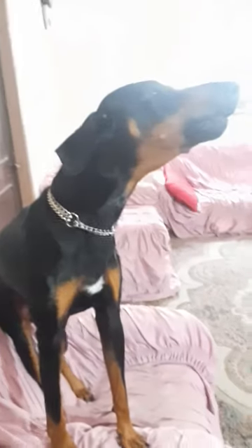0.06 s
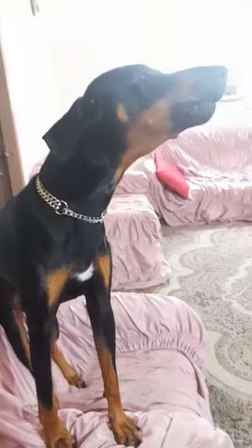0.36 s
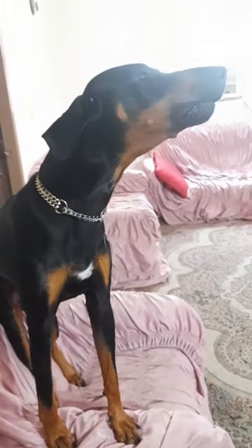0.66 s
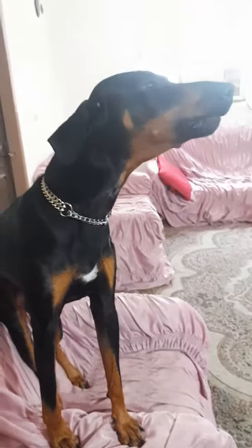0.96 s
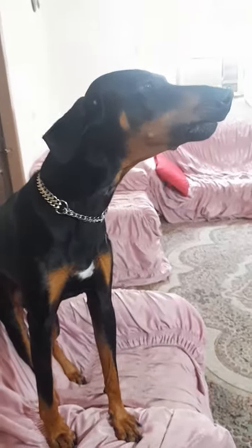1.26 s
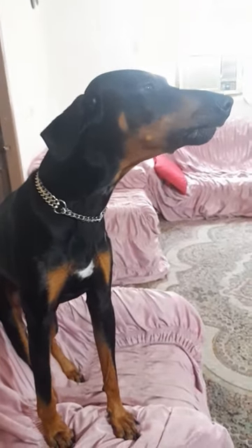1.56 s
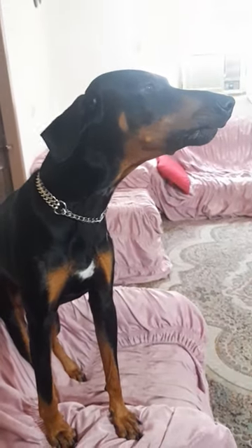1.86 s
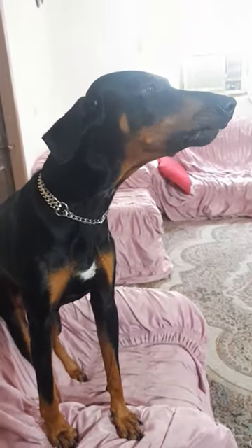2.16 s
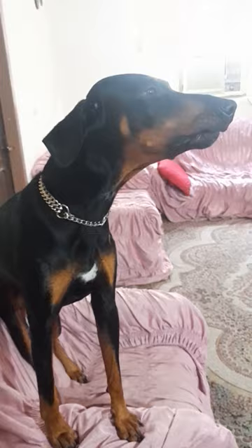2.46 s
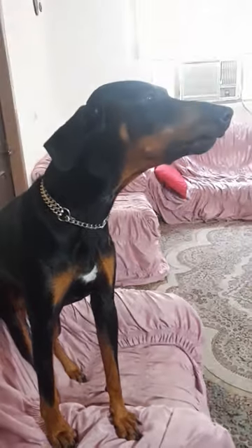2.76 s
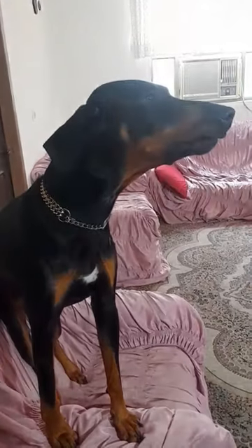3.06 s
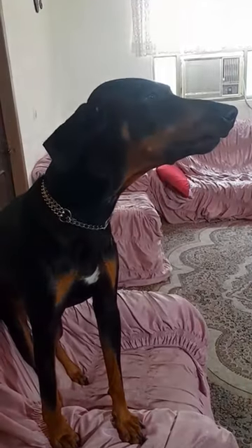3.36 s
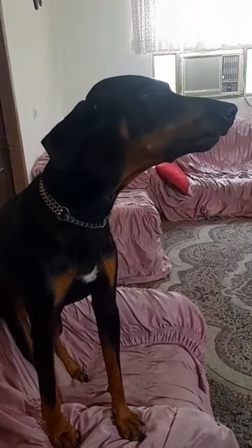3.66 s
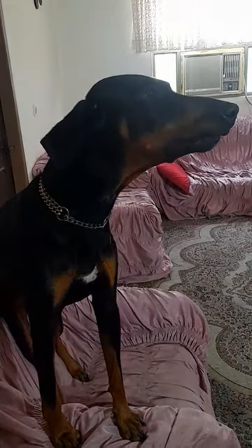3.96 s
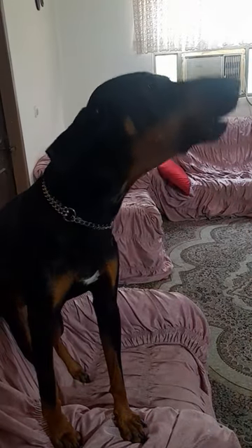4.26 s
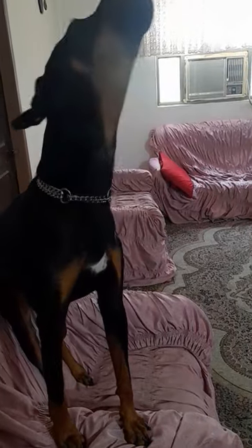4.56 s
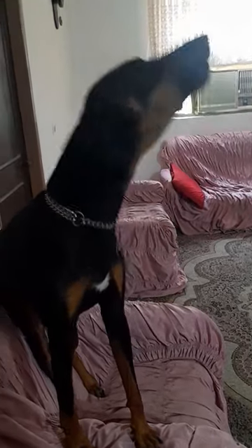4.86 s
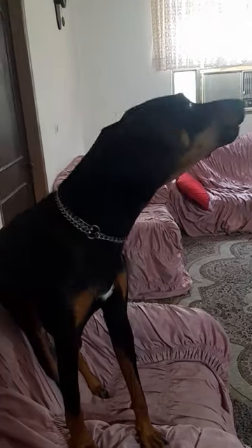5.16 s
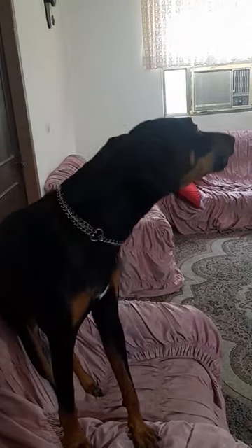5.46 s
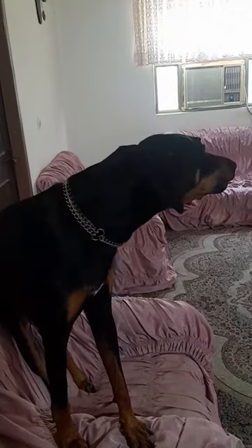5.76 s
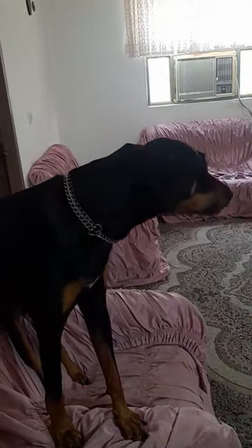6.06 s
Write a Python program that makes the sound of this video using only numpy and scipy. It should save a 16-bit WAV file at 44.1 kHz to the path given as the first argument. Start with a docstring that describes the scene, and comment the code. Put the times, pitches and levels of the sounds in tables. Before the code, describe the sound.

A large dog howls close to a phone microphone in a living room. The first howl is a clean, hollow note that sags and ends in a creak. In the pause, a window air conditioner's hum and rush slowly swell. Then the dog bursts out with a hoarse bark that cracks, clears into a second howl and falls away, pushing the hum down again.

```python
"""A furnished living room, where a large dog howls twice close to a phone.
Its vocal folds make a harmonic series, which mouth and nose filter by resonance. The first howl
is a clean note that sags into a creak; the second bursts out as a hoarse bark of turbulent air,
cracks, then clears and falls. A window air conditioner hums behind; the phone's gain control
pushes it down under each howl and lets it swell back in the pause."""
import sys
import numpy as np
from scipy import signal
from scipy.fft import rfft, irfft, next_fast_len
from scipy.io import wavfile
from scipy.ndimage import uniform_filter1d, map_coordinates

SR = 44100
rng = np.random.default_rng(int(sys.argv[2]) if len(sys.argv) > 2 else 0)


def to_wav(sig):
    """Store sig (one row per channel, or 1-D mono) as 16-bit WAV at the path in sys.argv[1].

    Samples outside -1..1 are clipped; the rate is SR.
    """
    pcm = np.clip(np.atleast_2d(sig), -1, 1) * 32767
    pcm = np.round(pcm).astype(np.int16)
    wavfile.write(sys.argv[1], SR, pcm.T)  # frames by channels


N = 273861


def amp(db):
    """Decibels to amplitude ratio."""
    return 10 ** (np.asarray(db) / 20)


def unit(x):
    """Normalisation to rms 1."""
    return x / np.sqrt(np.mean(x ** 2) + 1e-20)


def along(points, hz):
    """Interpolation of (f/Hz, value) points on a log axis."""
    f, v = np.transpose(points)
    return np.interp(np.log(hz + 1), np.log(f + 1), v)


def curve(rows, t):
    """Linear interpolation of (t/s, value) points."""
    return np.interp(t, *np.transpose(rows))


def envelope(gesture, t):
    """Linear rise, hold, exponential decay: (start/s, attack/s, hold/s, fall/(dB/s))."""
    start, attack, hold, fall = gesture
    return np.clip((t - start) / attack, 0, 1) * amp(-fall * np.maximum(t - start - attack - hold, 0))


def wobble(rate):
    """Smooth random modulation, rate knots a second."""
    knots = rng.standard_normal(int(N * rate / SR) + 4)
    coarse = np.arange(0, N, 32)
    return np.interp(np.arange(N), coarse, map_coordinates(knots, [coarse * rate / SR], order=2))


def filtered(x, response):
    """Linear filtering: the spectrum times a frequency response."""
    size = next_fast_len(N + SR // 2)
    return irfft(rfft(x, size) * response(np.fft.rfftfreq(size, 1 / SR)), size)[..., :N]


def coloured(x, spectrum):
    """Spectral shaping by (f/Hz, level/dB) points, at rms 1."""
    return unit(filtered(x, lambda hz: amp(along(spectrum, hz))))


def tones(phase, table):
    """Superposition of sines at whole or half multiples of the pitch."""
    return np.sqrt(2) * sum(amp(db) * np.sin(np.round(2 * k) / 2 * phase) for k, db in table)


def air_conditioner(air_db=-44, hiss_db=-72):
    """Broadband fan noise, partly coherent between the ports, under a motor's line spectrum."""
    # spectra of the air rush and the hiss: (f/Hz, relative level/dB)
    rush_spectrum = [(15, -51.5), (25, -24), (69, -4.5), (112, -6.5), (139, -1.5), (202, -3), (264, -8),
                     (427, -7), (709, -19.5), (1310, -24), (1860, -29), (4260, -42.5), (15000, -64.5)]
    hiss_spectrum = [(1500, -26), (4400, 2.5), (5800, -10), (8500, -9), (10000, -18)]
    # lines of motor and fan: (f/Hz, level/dB)
    motor_lines = [(80.7, -60.5), (145.3, -49.5), (193.8, -49), (290.7, -63.5), (387.6, -57), (436.0, -53),
                   (532.9, -60.5)]
    fan_lines = [(1157, -70), (1206, -74), (1254, -71), (1303, -73), (1351, -72), (1448, -72), (1642, -75),
                 (2126, -77)]
    # likeness of the rush at the two ports: (f/Hz, correlation)
    coherence = [(100, .93), (400, 0.66), (1000, 0.31)]
    t = np.arange(N) / SR

    def mid_and_side(hz):
        angle = np.arccos(np.clip(along(coherence, hz), -1, 1)) / 2
        return amp(along(rush_spectrum, hz)) * [np.cos(angle), np.sin(angle)]

    def line(hz, db):
        peak = np.sqrt(2) * amp(db + 1.5 * wobble(5))
        return peak * np.sin(2 * np.pi * (hz * t + rng.random()) + .25 * wobble(6))

    mid, side = filtered(rng.standard_normal((2, N)), mid_and_side)
    rush = amp(air_db + 1.3 * wobble(26)) * unit(np.array([mid + side, mid - side]))
    flutter_db = 4 * np.tanh(wobble(14))
    hiss = amp(hiss_db + flutter_db) * coloured(rng.standard_normal((2, N)), hiss_spectrum)
    hum = sum(line(hz, db) for hz, db in motor_lines)
    whine = np.array([sum(line(hz, db) for hz, db in fan_lines) for port in range(2)])
    return (rush + hiss + hum + whine) * amp([[-.7], [.7]])


def fundamental_db(pitch, t, middle_hz=301.1, middle_db=-22, db_per_octave=40.5, beat_width_s=0.017):
    """The fundamental grows with pitch; interference with the room's echoes lifts or sinks it."""
    # the room's standing waves: (f/Hz, gain/dB)
    standing_waves = [(210, -2), (232, 4.5), (254, 5), (270, -4.5), (292, 2), (307, -5.5), (311, 0.5),
                      (314, 2.5), (335, 5), (365, 1)]
    # dips as the note beats against its echo: (t/s, depth/dB)
    beats = [(4.392, 6.5), (4.43, 10), (4.604, 9.5), (4.668, 9), (4.779, 9), (5.283, 9), (5.847, 11),
             (5.99, 9.5)]
    # envelope of the shove of air at the head of the bark
    push = (4.298, 0.015, 0.021, 180)
    source_db = middle_db + db_per_octave * np.log2(pitch / middle_hz) + 4 * envelope(push, t)
    dips_db = sum(depth * np.exp(-((t - s) / beat_width_s) ** 2) for s, depth in beats)
    return source_db + along(standing_waves, pitch) - dips_db


def overtones(phase, pitch, spectrum, orders, on, flicker_db):
    """Formant filtering: harmonics glide through resonances, each flickering; rms 1 together."""
    flicker = flicker_db * np.array([wobble(5)[on] for k in orders])
    gains = amp(along(spectrum, orders[:, None] * pitch[on]) + flicker)
    waves = np.sin(orders[:, None] * phase[on] + rng.uniform(0, 2 * np.pi, (len(orders), 1)))
    return (gains * waves).sum(0) / np.sqrt((gains ** 2).sum(0) / 2)


def mouth(phase, pitch, t, on):
    """Cavity resonance shapes harmonics 4-8; a raised muzzle and rounded lips lower the formants."""
    # mouth resonances: (f/Hz, relative level/dB)
    formants = [(1000, -7), (1280, 0), (1560, -8), (1840, -9), (2130, -17), (2380, -26), (2630, -21),
                (3200, -38)]
    # their shift by the lips: (t/s, frequency factor)
    lips = [(4.3, 1.02), (4.45, 0.89), (4.6, 0.84), (4.9, 1.1), (5.15, 0.91)]
    return overtones(phase, pitch / curve(lips, t), formants, np.arange(4, 9), on, flicker_db=5)


def nose(phase, pitch, puffs, rough, on):
    """Nasal resonance, driven by harmonics 9-33 and, as the voice roughens, by turbulence."""
    # nasal resonances: (f/Hz, relative level/dB)
    formants = [(1500, -55.5), (2650, -12.5), (3300, -33), (4400, -15), (4920, 2), (5250, -14.5),
                (5700, -14), (7300, -25), (8100, -15.5), (9800, -38.5), (15000, -30.5)]
    noise_share = np.clip(rough + .04, 0, 1)
    ring = np.sqrt(noise_share) * coloured(puffs, formants)
    harmonics = overtones(phase, pitch, formants, np.arange(9, 34), on, flicker_db=4)
    ring[on] += np.sqrt(1 - noise_share[on]) * harmonics
    return ring


def whistle(phase, t, db=-59):
    """Constriction: the tight throat brings out a few high harmonics as the first howl opens."""
    # whistle partials: (multiple of the pitch, relative level/dB)
    partials = [(8, -2), (18, -6), (21, -3.5), (25, -1.5), (28, -11.5)]
    # envelope of the tightening
    tightening = (0, .005, .01, 35)
    return amp(db) * envelope(tightening, t) * tones(phase, partials)


def howl(melody, octave, mouth_level, nasal_db, jitter=0.013, tremor=0.0008, shimmer_db=3, fade_s=0.003):
    """Source and filter: vocal folds drive the throat; irregular cycles make it creak and rasp."""
    # resonances met by the third harmonic: (f/Hz, level/dB)
    third_resonances = [(630, -66), (785, -45.5), (930, -50.5), (985, -46), (1060, -34)]
    # the hoarse throat: (f/Hz, relative level/dB)
    rasp_spectrum = [(50, -60), (150, -24), (330, -3), (500, -13), (720, -2), (930, -9), (1170, 0),
                     (1600, -16), (2250, -10), (2900, -33), (5000, -33), (10000, -60)]
    # envelopes of the hoarse burst and of the strain that makes the nose ring
    burst = (4.298, 0.02, 0.081, 140)
    strain = (4.3, 0.039, .14, 32)
    t = np.arange(N) / SR
    start, end = melody[0][0], melody[-1][0]
    gate = np.sin(np.pi / 2 * np.clip(np.minimum(t - start, end + 2 * fade_s - t) / fade_s, 0, 1)) ** 2
    on = gate > 0
    note, octave_db, bark = curve(melody, t), curve(octave, t), envelope(burst, t)
    sag_hz = np.maximum(262 - note, 0)  # the voice creaks below 262 Hz
    rough = np.clip(0.12 + 0.97 * bark + 0.02 * sag_hz, 0, 1)
    pitch = note * (1 + jitter * rough * wobble(230) + tremor * wobble(35))
    phase = 2 * np.pi * np.cumsum(pitch) / SR
    # the three lowest harmonics carry the hollow tone
    first_db = fundamental_db(note, t)
    voice = tones(phase, [(1, first_db), (2, octave_db + 0.4), (3, along(third_resonances, 3 * note))])
    voice += whistle(phase, t) + crack(phase, t)
    voice[on] += amp(curve(mouth_level, t)[on] + 3) * mouth(phase, pitch, t, on)
    puffs = (1 + 1.1 * np.cos(phase)) * rng.standard_normal(N)  # one turbulent puff per cycle
    # the nasal ring follows the second harmonic, rises with strain and fades in the creak
    ring_db = nasal_db + 0.64 * (octave_db + 38.5) + 16 * envelope(strain, t) - .25 * sag_hz
    voice += amp(ring_db) * nose(phase, pitch, puffs, rough, on)
    rasp, breath = amp(-26.5) * bark, amp(first_db - 46)
    voice += (rasp + breath) * coloured(puffs, rasp_spectrum)
    return gate * voice * amp(shimmer_db * rough * np.tanh(wobble(120)))


def room(x, gap_s=.005):
    """Reverberation: diffuse reflections decay exponentially, the treble fastest."""
    # reverberation time: (f/Hz, T60/s)
    decay = [(150, 1.01), (2000, 0.58), (12000, 0.2)]
    # strength of the reflections: (f/Hz, level/dB)
    reflections = [(330, -15), (600, -8.5), (1200, -9), (5000, -3)]
    hz, t, noise = signal.stft(rng.standard_normal((2, SR // 2)), SR, nperseg=256)
    tail = signal.istft(noise * amp(-60 * t / along(decay, hz)[:, None]), SR, nperseg=256)[1]
    tail = np.pad(tail / np.linalg.norm(tail, axis=1, keepdims=True), ((0, 0), (int(gap_s * SR), 0)))
    mid, side = signal.fftconvolve(x[None], tail, axes=1)[:, :N]
    side = filtered(side, lambda hz: np.clip(hz / 900, 0, 1) ** 2)  # long waves reach both ports alike
    diffuse = np.array([mid + side, mid - side]) / np.sqrt(2)
    return filtered(diffuse, lambda hz: amp(along(reflections, hz)))


def ducking(voice, window_s=0.035, threshold_db=-31.5, cut_share=0.75, recover_db_per_s=4):
    """Automatic gain control: a loud voice cuts the background at once, and it creeps back."""
    level_db = 10 * np.log10(np.abs(uniform_filter1d(voice ** 2, int(window_s * SR))) + 1e-12)
    recovery_db = recover_db_per_s * np.arange(N) / SR
    cut_db = cut_share * np.maximum(level_db - threshold_db, 0)
    return amp(recovery_db - np.maximum.accumulate(cut_db + recovery_db))


def woof(at_s=4.317, width_s=.011, db=-20):
    """Chest resonance: a short, low pulse of noise as the bark breaks out."""
    # chest resonances: (f/Hz, relative level/dB)
    chest = [(50, -59.5), (115, -1.5), (145, 0.5), (200, -9.5), (280, -1.5), (1000, -52.5)]
    pulse = np.exp(-((np.arange(N) / SR - at_s) / width_s) ** 2 / 2)
    return amp(db) * pulse * coloured(rng.standard_normal(N), chest)


def crack(phase, t, db=-39):
    """Period doubling: every other cycle is stronger, adding tones between the harmonics."""
    # half-order partials: (multiple of the pitch, relative level/dB)
    partials = [(.5, -13.5), (1.5, 5), (2.5, -1.5), (3.5, -18)]
    # envelope of the doubling
    doubling = (4.55, 0.11, 0.011, 300)
    return amp(db) * envelope(doubling, t) * tones(phase, partials)


def scene(lead_s=0.0002, away_hz=2800):
    """Direct and reverberant sound of the dog add at two microphone ports, over the air conditioner."""
    # pitch of each howl: (t/s, f/Hz)
    first_pitch = [(0, 314.8), (0.502, 312), (0.669, 307.3), (0.814, 293.6), (0.889, 273.1), (1.073, 265.3),
                   (1.3, 254.9), (1.412, 218.6), (1.486, 207.8)]
    second_pitch = [(4.3, 305), (4.32, 330.3), (4.385, 365.7), (4.455, 346.5), (4.5, 316), (4.61, 357.4),
                    (4.78, 322.8), (5.283, 291.7), (5.373, 309.6), (5.83, 295.3), (5.985, 272.8),
                    (6.2, 242)]
    # second harmonic and mouth overtones, one curve per howl: (t/s, relative level/dB)
    octaves = [
        [(0.03, -40), (0.582, -43), (0.652, -55), (0.712, -32), (1.086, -47), (1.11, -35), (1.258, -41),
         (1.448, -32), (1.49, -47.5)],
        [(4.305, -23.5), (4.403, -16), (4.429, -22), (4.687, -32), (5.149, -25.5), (5.181, -33.5), (5.727, -48),
         (5.779, -67), (6.19, -36)],
    ]
    mouth_levels = [
        [(0.03, -57.5), (0.49, -57), (0.734, -44), (0.952, -51), (1.092, -49), (1.172, -43.5), (1.432, -68.5),
         (1.47, -83)],
        [(4.55, -47), (4.826, -60), (5.27, -45), (5.566, -53), (5.752, -46), (6.048, -61), (6.12, -53.5),
         (6.18, -66)],
    ]
    # nasal ring, one value per howl: (base level/dB)
    nasal_levels = [-66.5, -70.5]
    # the room favours one port or the other: (f/Hz, left minus right level/dB)
    balance = [(330, -.5), (560, 0.5), (680, 7.5), (900, -2.5), (1150, -5), (2000, 2), (5000, -1),
               (8000, 5)]
    howls = zip([first_pitch, second_pitch], octaves, mouth_levels, nasal_levels)
    dog = woof() + sum(howl(*parts) for parts in howls)
    ports = np.array([[1], [-1]])
    # the voice reaches the left port first, dulled because the muzzle points away
    direct = filtered(dog, lambda hz: np.exp(1j * np.pi * hz * lead_s * ports) / np.hypot(1, hz / away_hz))
    heard = filtered(direct + room(dog), lambda hz: amp(ports * along(balance, hz) / 2))
    return heard + ducking(dog) * air_conditioner()


def record(dry, bass_hz=45, top_hz=15400):
    """Band limiting: the phone drops the deepest bass and the highest treble."""
    return filtered(dry, lambda hz: (hz < top_hz) * np.clip(hz / bass_hz, 0, 1) ** 2)


dry = scene()
out = record(dry)
to_wav(out)
```